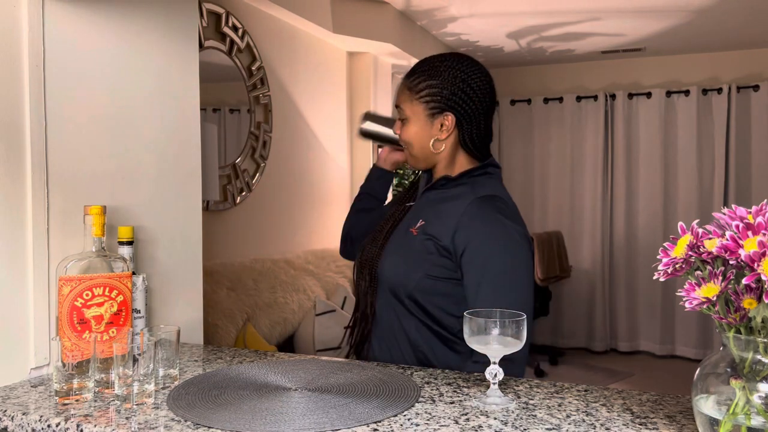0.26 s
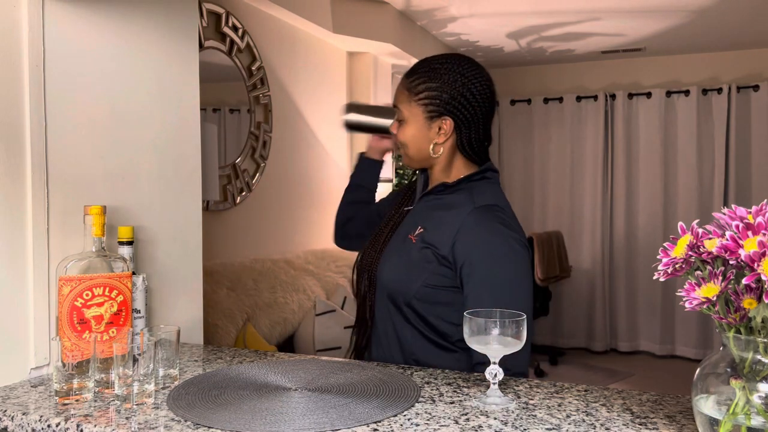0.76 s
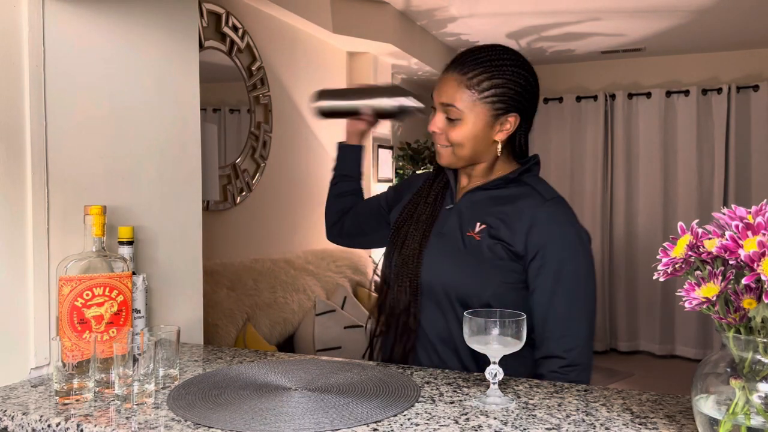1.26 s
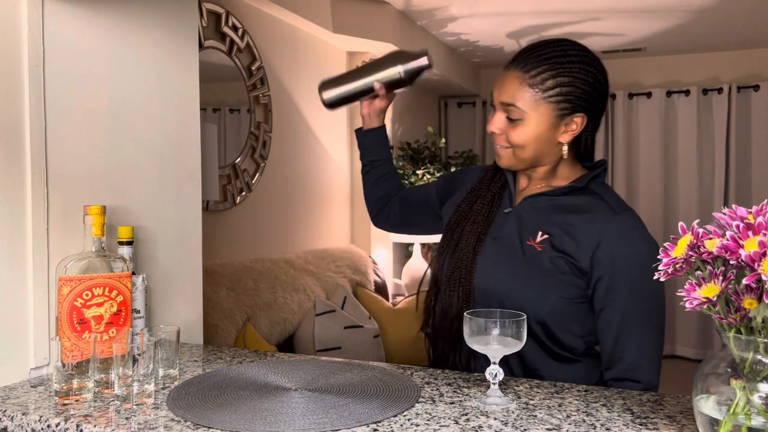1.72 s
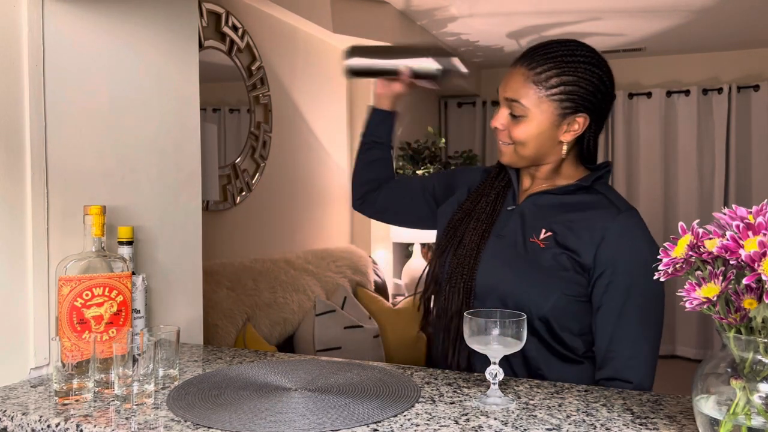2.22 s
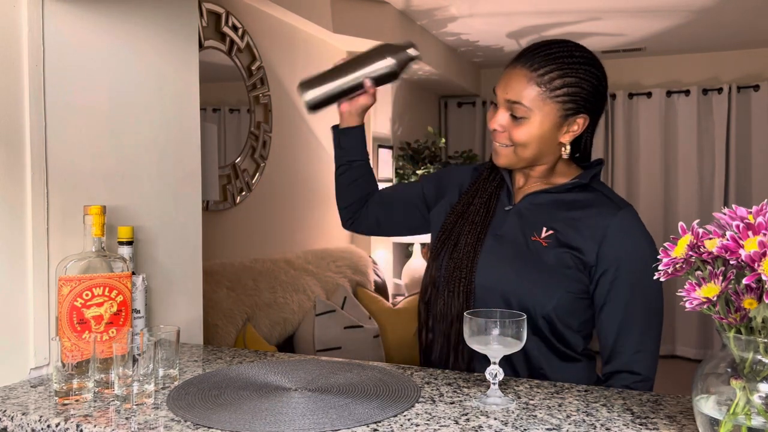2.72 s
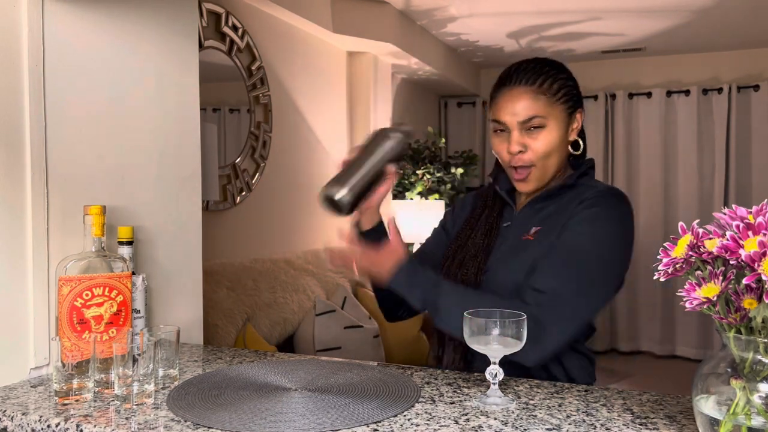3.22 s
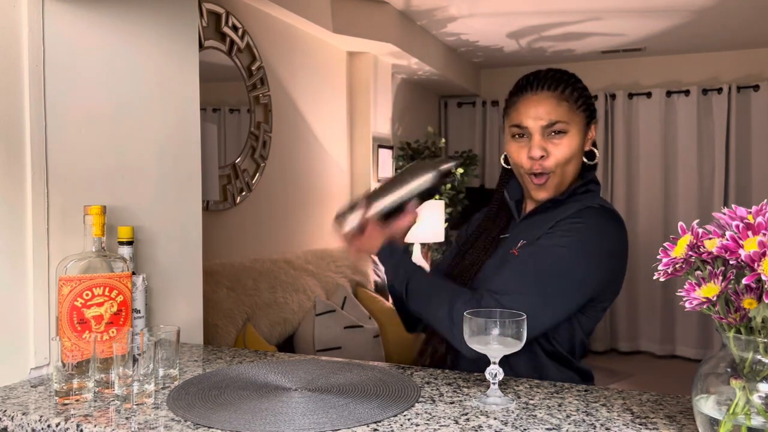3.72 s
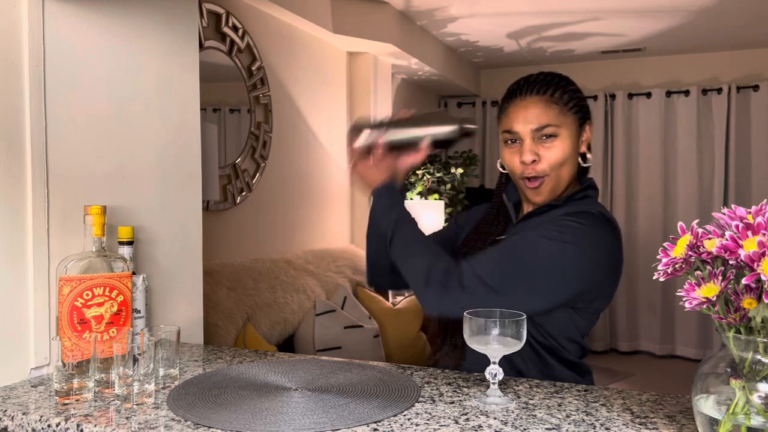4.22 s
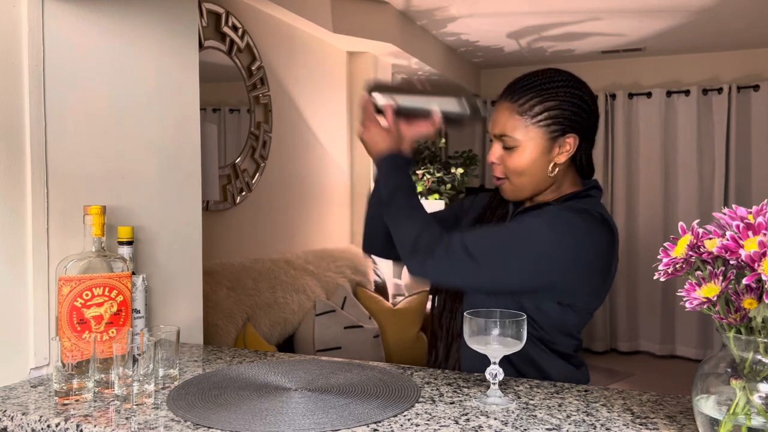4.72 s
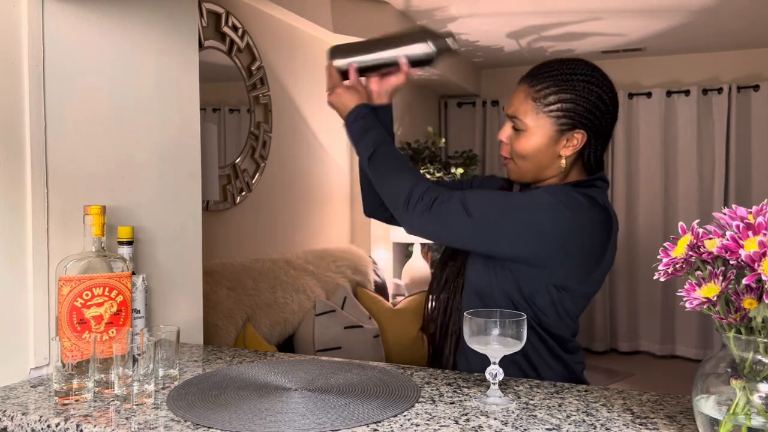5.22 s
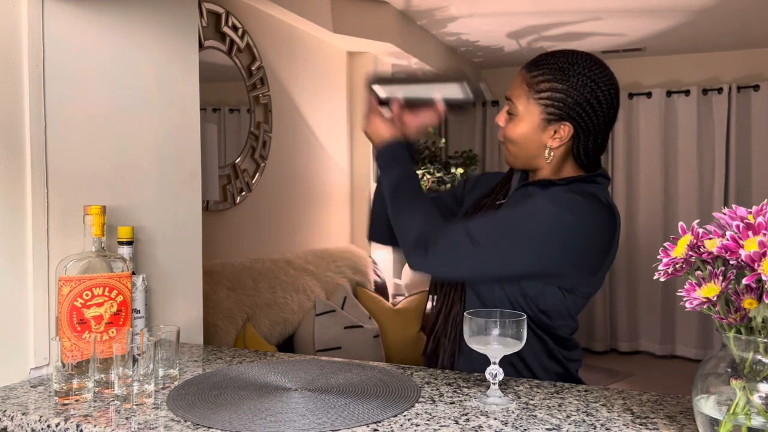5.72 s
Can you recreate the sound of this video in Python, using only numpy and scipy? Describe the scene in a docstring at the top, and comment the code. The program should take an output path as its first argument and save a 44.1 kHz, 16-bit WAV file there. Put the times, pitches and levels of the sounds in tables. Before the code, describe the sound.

A metal cocktail shaker full of ice and liquid is shaken fast throughout. Cubes crash into each end with hard clacks, chips hiss and tumble between, and hollow wet knocks follow. The rhythm loosens briefly a little past three seconds, then resumes. Close stereo pickup in a furnished home with short, lively reflections and faint room air.

```python
"""Ice cubes crash into the ends of a steel cocktail shaker, shaken hard about four strokes to and fro a second.
The crashes are piled-up noise bursts, each touch with its own notes; the liquid slaps after them with a hollow
knock, a sine whose pitch settles. In between, chips and froth churn along the wall as random ticks through
resonators. The hand-damped steel rings briefly, a living room answers, and faint air and hum lie beneath."""
import sys
import numpy as np
from scipy import signal
from scipy.fft import rfft, irfft
from scipy.io import wavfile
from scipy.ndimage import uniform_filter1d

SR = 44100
rng = np.random.default_rng(int(sys.argv[2]) if len(sys.argv) > 2 else 0)


def unload_audio(sound):
    """Save the sound as a 16-bit wav file, at the path given as the first command line argument."""
    columns = np.transpose(np.atleast_2d(sound))
    # keep every value between -1 and 1, then stretch to whole-number steps
    steps = np.round(np.clip(columns, -1, 1) * 32767)
    wavfile.write(sys.argv[1], SR, steps.astype(np.int16))


N = 262836  # length in samples


def amp(db):
    """Decibels to gain."""
    return 10 ** (np.asarray(db) / 20)


def unit(x):
    """Scales to rms 1."""
    return x / np.sqrt(np.mean(x ** 2) + 1e-20)


def crest(x, size=176):
    """Scales the loudest few milliseconds to rms 1."""
    return x / np.sqrt(uniform_filter1d(x ** 2, size).max() + 1e-20)


def read(points, hz):
    """Reads a curve on a log-frequency axis."""
    f, value = np.transpose(points)
    return np.interp(np.log(hz + 1), np.log(f), value)


def add(mix, s, sound):
    """Adds a sound to the mix at time s."""
    part = mix[max(round(s * SR), 0):][:len(sound)]
    part += sound[:len(part)]


def impulse(points, size=2048):
    """The causal, minimum-phase click that has this spectrum."""
    hz = abs(np.fft.fftfreq(size, 1 / SR))
    log_gain = np.log(amp(read(points, hz)))
    return np.fft.ifft(np.exp(np.conj(signal.hilbert(log_gain)))).real


def through(x, response):
    """Convolves and keeps the length."""
    return signal.oaconvolve(x, response)[:len(x)]


def resonate(x, hz, width):
    """One resonance of gain about 1: a wider band dies sooner."""
    r = np.exp(-np.pi * width / SR)
    turn = r * np.cos(2 * np.pi * hz / SR)
    return 2 * (1 - r) * signal.lfilter([1, -turn], [1, -2 * turn, r ** 2], x + 1e-18)


# still air of the room: pitch_hz, density_db (dB per Hz, relative)
AIR = [(20, -18), (68, 4.5), (100, -3.5), (150, -1), (300, -16), (16000, -30)]
# mains hum: pitch_hz, level_db
HUM = [(120, -62)]


def background():
    """Low, slowly swelling room air with a trace of mains hum."""
    t = np.arange(N) / SR
    shared, left, right = (unit(through(rng.standard_normal(N), impulse(AIR, size=8192))) for _ in range(3))
    slow_noise = resonate(resonate(rng.standard_normal(N), 5.6, 4.6), 5.6, 4.6)
    swell = amp(3.8 * unit(slow_noise))
    hum = sum(amp(db) * unit(np.sin(2 * np.pi * hz * t)) for hz, db in HUM)
    return amp(-57.0) * swell * (shared + np.array([left, right]) / 10) + hum


# reverberation: pitch_hz, t60_s
ROOM = [(300, 0.17), (3000, 0.26), (14000, 0.19)]


def room(x, size=22050, count=14):
    """Counter, wall and ceiling echo first; then a diffuse tail dies band by band."""
    t = np.arange(size) / SR
    taps = rng.choice([-1., 1.], size) * (rng.random(size) < .09) * (t > .005)
    hz, when, z = signal.stft(taps, SR, nperseg=256)
    decay = amp(-60 * when / read(ROOM, hz)[:, None])
    tail = signal.istft(z * decay, SR, nperseg=256)[1][:size]
    early = np.zeros(size)
    early[(rng.uniform(.0003, .006, count) * SR).astype(int)] = rng.choice([-1., 1.], count)
    return through(x, amp(-2.5) * tail / np.linalg.norm(tail) + amp(-1.5) * early / np.sqrt(count))


def echoes(x, count=5):
    """The shaker keeps moving, so the sound passes from one pattern of echoes to the next."""
    place = np.arange(N) / SR * 14  # 14 patterns a second, in rotation
    nearness = (np.maximum(1 - abs((place - k) % count - 1), 0) for k in range(count))
    return sum(room(x * np.sqrt(share)) for share in nearness)


# ring of the steel: pitch_hz, width_hz, level_db (over the plain blow)
STEEL = [(1312, 130, 2), (2680, 104, -4), (5700, 59, -31)]
# the air inside the shaker once the liquid has settled
HOLLOW_HZ, HOLLOW_WIDTH_HZ, HOLLOW_DB = 595, 61, -2


def shaker(x):
    """The steel wall rings on after every blow, and so does the hollow, whose pitch moves with the liquid."""
    start_s, _, knock_hz = np.transpose(SLAPS)
    liquid_hz = np.interp(np.arange(N) / SR, start_s, knock_hz)
    hollow_hz = np.sqrt(HOLLOW_HZ * liquid_hz)
    # shift the hollow's pitch down to zero, smooth, and shift back: a resonance that glides
    turn = np.exp(2j * np.pi * np.cumsum(hollow_hz) / SR)
    r = np.exp(-np.pi * HOLLOW_WIDTH_HZ / SR)
    hollow = 2 * (turn * signal.lfilter([1 - r], [1, -r], x / turn)).real
    steel = sum(amp(db) * resonate(x, hz, width) for hz, width, db in STEEL)
    return x + amp(HOLLOW_DB) * hollow + steel


def contacts(count, per_s, spread_db):
    """Random touches of ice: mostly small, a few large."""
    size = np.minimum(rng.exponential(1, count), 3.5)
    sign = rng.choice([-1, 1], count)
    at = np.flatnonzero(rng.random(count) < per_s / SR)
    out = np.zeros(count)
    out[at] = sign[at] * amp(spread_db * size[at])
    return out


def grains(low_hz, high_hz, width_hz, per_s, count=14):
    """Sparse contacts, each ringing at one of many pitches."""
    pitches = low_hz * (high_hz / low_hz) ** ((np.arange(count) + rng.random(count)) / count)
    return unit(sum(resonate(contacts(N, per_s / count, spread_db=2.5), hz, width_hz) for hz in pitches))


def clumps(per_s, decay_s):
    """Each falling cube sets off a short flurry: a level that jumps and dies away."""
    falls = abs(contacts(N, per_s, spread_db=3.5))
    flurry = signal.lfilter([1], [1, -np.exp(-1 / (decay_s * SR))], falls ** 2)
    return unit(.5 + np.sqrt(unit(flurry)))


# loose chips that never come to rest; they nearly stop as the grip changes at 3.3 s:
# start_s, level_db (relative, within the churn)
LOOSE = [(0, -39), (1.6, -38.5), (2.9, -32.5), (3.36, -45), (3.52, -33), (4.25, -37), (4.8, -33.5),
         (5.96, -38.5)]
# the churn rises with the crash, holds while the load tumbles, then dies
CHURN_RISE_S, CHURN_FALL_DB_PER_S = 0.02, 267
# the load tumbles this long at this churn level, longer when thrown harder
TUMBLE_S, TUMBLE_AT_DB = 0.069, -27.5
# the load is faintly heard sliding up to the end just before it lands
SLIDE_S, SLIDE_DB = .016, -9


def sweep_of_load():
    """Each stroke stirs the load up: a slide, a quick rise, a hold and a steady fall, over the loose chips."""
    t = np.arange(N) / SR
    power = amp(np.interp(t, *np.transpose(LOOSE))) ** 2
    for s, *_, churn_db in STROKES:
        tumble_s = TUMBLE_S * amp(churn_db - TUMBLE_AT_DB)
        near = slice(max(round((s - .1) * SR), 0), round((s + .4) * SR))
        age = t[near] - s
        slide = amp(SLIDE_DB) * np.exp(np.minimum(age, 0) / SLIDE_S)
        rise = np.minimum(slide + np.maximum(age, 0) / CHURN_RISE_S, 1)
        fall_db = CHURN_FALL_DB_PER_S * np.maximum(age - tumble_s, 0)
        power[near] += (rise * amp(churn_db - fall_db)) ** 2
    return np.sqrt(power)


def churn():
    """Tumbling cubes, fine chips and sloshing liquid all follow the sweep of the load."""
    t = np.arange(N) / SR
    start_s, clack_db, crack_db, *_ = np.transpose(STROKES)
    # after a dry, bright crash the chips hiss; after a wet, dull one the cubes and the liquid take over
    brightness_db = crack_db - clack_db
    dryness_db = np.clip(brightness_db - np.median(brightness_db), -10, 10)
    dryness = amp(np.interp(t - 0.03, start_s, dryness_db))

    cubes = unit(contacts(N, per_s=260, spread_db=2.5))
    chips = unit(contacts(N, per_s=1100, spread_db=5.0))
    tumble = unit(through(cubes, impulse(CLACK))) + grains(948, 1995, width_hz=120, per_s=140)
    fizz = unit(through(chips + cubes, impulse(CRACK)))
    fizz = fizz + amp(-4.0) * grains(2507, 5780, width_hz=68, per_s=130)
    ticks = unit(through(chips + cubes, impulse(TINK)))
    slosh = unit(resonate(grains(455.0, 803, width_hz=25.5, per_s=80), 880, 620))

    bright = (amp(-5.5) * fizz + amp(-16.5) * ticks) * dryness ** 0.047
    dull = (amp(-6.5) * tumble + amp(-7.0) * slosh) / dryness ** 0.35
    return sweep_of_load() * clumps(per_s=110, decay_s=0.011) * (bright + dull)


# a cube hits the bare steel with a bright tick: start_s, level_db (relative)
TINKS = [(0.705, -23), (0.983, -24), (1.139, -19.5), (1.246, -11.5), (1.377, -22), (1.503, -15),
         (2.041, -22.5), (2.569, -24), (3.042, -25), (3.2255, -25), (4.614, -24)]
# high ring of the bare steel under a sharp tick: pitch_hz, width_hz, level_db (over the plain tick)
SHIMMER = [(13100, 53, -2), (14000, 110, 13)]
# a cube strikes cleanly and rings: start_s, level_db (relative), pitch_hz
CLINKS = [(0.86, -21, 2424), (1.252, -19.5, 1675), (2.042, -24.5, 1646), (2.831, -26, 1353),
          (3.543, -26, 1510), (4.098, -29.5, 2680), (4.864, -24, 1870), (5.328, -26, 1560),
          (5.947, -25, 1890)]


def clinks(size=4000):
    """Dry contacts: bright ticks of the steel and short pitched rings of the ice, shorter when higher."""
    t, out = np.arange(size) / SR, np.zeros(N)
    for s, db in TINKS:
        tick = through(rng.standard_normal(size) * np.exp(-t / 0.0042), impulse(TINK))
        ring = sum(amp(ring_db) * resonate(tick, hz, width) for hz, width, ring_db in SHIMMER)
        add(out, s, amp(db - 5.0) * crest(tick + ring))
    for s, db, hz in CLINKS:
        shape = (1 - np.exp(-t / 0.00008)) * np.exp(-t * hz / 19)
        add(out, s, amp(db) * crest(np.sin(2 * np.pi * hz * t) * shape))
    return out


# the liquid slaps an end and the air pocket knocks, lower as the drink froths up:
# start_s, level_db (relative), pitch_hz (at the onset)
SLAPS = [(.197, -17, 725), (.226, -21, 617), (.329, -20, 787), (.454, -20.5, 736), (.704, -14, 680),
         (.737, -24.5, 614), (.995, -16, 670), (1.397, -21, 722), (1.509, -22.5, 622), (1.812, -23, 590),
         (2.053, -21, 587), (2.096, -27, 600), (2.204, -21, 717), (2.3, -23, 570), (2.332, -22.5, 573),
         (2.455, -23.5, 702), (2.576, -22, 565), (2.817, -29, 573), (3.055, -19.5, 596),
         (3.226, -13.5, 585), (3.557, -27, 570), (3.606, -16, 581), (3.754, -23, 600), (3.775, -26.5, 530),
         (4.06, -26.5, 605), (4.188, -17.5, 601), (4.219, -23.5, 522), (4.459, -22, 620),
         (4.542, -25.5, 580), (4.615, -20, 652), (5.087, -17, 506), (5.336, -21.5, 572), (5.393, -22, 590),
         (5.432, -25, 570), (5.479, -18.5, 598), (5.508, -19, 608), (5.535, -25, 569), (5.948, -25, 616)]
KNOCK_RISE_S, KNOCK_FALL_S, SETTLE_S = 0.0035, 0.0036, 0.064
AFTER_RING_DB, AFTER_RING_S = -19.5, 0.017  # the hollow sings on after a knock
# the whole load lands at once and thumps against the hand: start_s, level_db (relative)
THUMPS = [(.073, -37), (.329, -35), (0.597, -41), (.862, -37), (1.501, -33), (4.187, -35), (4.325, -36)]
THUMP_HZ, THUMP_S = 253, 0.0045


def slaps(size=5000):
    """The air pocket swells and rings while its pitch settles to that of the hollow; a heavy landing thumps too."""
    t, out = np.arange(size) / SR, np.zeros(N)
    fall = np.exp(-t / KNOCK_FALL_S) + amp(AFTER_RING_DB) * np.exp(-t / AFTER_RING_S)
    shape = (1 - np.exp(-t / KNOCK_RISE_S)) ** 2 * fall
    for s, db, hz in SLAPS:
        pitch_hz = HOLLOW_HZ + (hz - HOLLOW_HZ) * np.exp(-t / SETTLE_S)
        knock = np.sin(2 * np.pi * np.cumsum(pitch_hz) / SR)
        gurgle = resonate(rng.standard_normal(size), hz, 270)
        add(out, s, amp(db) * crest(shape * (knock + amp(-9) * unit(gurgle))))
    for s, db in THUMPS:
        push = rng.standard_normal(size) * t * np.exp(-t / THUMP_S)
        thump = resonate(resonate(push, THUMP_HZ, THUMP_HZ), THUMP_HZ, THUMP_HZ)
        add(out, s, amp(db) * crest(thump))
    return out


# each turn of the shaker, when the load crashes into an end (levels relative):
# start_s, clack_db, crack_db, pile_s (time scale of the cubes piling up), churn_db
STROKES = [ (0.069, -22, -29.5, 0.01, -32), (0.196, -22.5, -34.5, 0.017, -59),
           (0.3278, -20.5, -23, 0.01, -32), (0.452, -25.5, -31, 0.025, -41),
           (0.586, -24.5, -24.5, 0.019, -33), (.706, -24, -30, 0.0065, -34.5),
           (0.838, -21.5, -24.5, 0.028, -29), (0.9944, -19.5, -25, 0.013, -48),
           (1.123, -25, -26, 0.025, -32.5), (1.2434, -21, -23, 0.014, -29),
           (1.385, -25, -25.5, 0.022, -30.5), (1.502, -16, -21.5, 0.0096, -31.5),
           (1.637, -29.5, -24.5, 0.023, -28.5), (1.774, -27.5, -43, 0.022, -33.5),
           (1.934, -25, -25, 0.018, -33), (2.06, -24, -32, 0.015, -46), (2.194, -26.5, -24, 0.018, -30),
           (2.3209, -25.5, -33, 0.016, -41), (2.443, -27.5, -26.5, 0.012, -28),
           (2.5692, -23, -30.5, 0.023, -48), (2.674, -30, -26.5, 0.032, -29),
           (2.8242, -20.5, -31.5, 0.013, -44), (2.8899, -41, -31, 0.0099, -37),
           (3.041, -21.5, -33.5, 0.021, -42), (3.223, -23, -41, 0.024, -32),
           (3.416, -32, -28.5, 0.01416, -29.5), (3.61, -36.5, -31, 0.031, -38),
           (3.74, -24.5, -28.5, 0.025, -43), (3.85, -38, -29, 0.023, -51), (3.943, -15.5, -24, 0.0035, -34),
           (4.064, -52, -30.5, 0.018, -30.5), (4.1854, -22, -28.5, 0.016, -38),
           (4.294, -27, -22, 0.03, -26.5), (4.428, -21, -31, 0.0071, -34),
           (4.617, -20.5, -24.5, 0.025, -31), (4.7367, -36, -25.5, 0.0064, -28),
           (4.959, -29.5, -26, 0.018, -31), (5.0721, -21.5, -26.5, 0.021, -44),
           (5.197, -25, -24.5, 0.0123, -27), (5.39, -27, -25.5, 0.0032, -33),
           (5.488, -26.5, -27, 0.0062, -30), (5.612, -28, -25.5, 0.019, -29),
           (5.804, -26.5, -21.5, 0.0062, -31), (5.899, -24.5, -32, 0.021, -32.5)]
# a cube out of step with the rest lands alone: start_s, clack_db, crack_db (relative)
STRAYS = [(.084, -28, -31), (.48, -21, -53), (0.6, -21.5, -26), (0.8716, -17, -20.5), (0.982, -22, -28),
          (1.031, -23.5, -33), (1.216, -25.5, -31), (1.2775, -21.5, -37), (1.4015, -20.5, -24.5),
          (1.6834, -26.5, -28), (1.751, -27.5, -27.5), (1.8109, -22.5, -29), (1.995, -35, -31),
          (2.018, -24, -24.5), (2.041, -22, -27.5), (2.0918, -23.5, -36), (2.18, -25, -22.5),
          (2.4532, -18.5, -23.5), (2.532, -23, -33), (2.755, -18.5, -29), (2.772, -33.5, -30.5),
          (2.933, -23.5, -32), (2.992, -25.5, -31), (3.205, -21.5, -29.5), (3.45, -36, -41),
          (3.491, -20.5, -27), (3.5624, -23.5, -23.5), (4.171, -24, -26), (4.51, -28.5, -26.5),
          (4.756, -23.5, -33), (4.826, -18, -25), (4.8611, -20, -27.5), (4.931, -24.5, -28),
          (5.046, -23.5, -23), (5.096, -17.5, -43), (5.329, -25.5, -31), (5.509, -28, -44),
          (5.539, -23, -41), (5.59, -29, -27), (5.659, -28.5, -19.5), (5.689, -20, -24), (5.861, -27, -28)]
BOUNCE_S = 0.00465  # time scale on which a lone cube settles


def landings():
    """Whole loads and lone cubes alike: start_s, clack_db, crack_db, pile_s."""
    return [row[:4] for row in STROKES] + [(*row, BOUNCE_S) for row in STRAYS]


# spectra of the blows, dull to bright: pitch_hz, density_db (dB per Hz, relative)
CLACK = [(60, -22.5), (200, -16.5), (380, -3.5), (520, 2), (1000, 0), (1600, -5), (2300, -4), (3000, -30),
         (6000, -41)]
CRACK = [(700, -56), (1800, -3), (2700, -2), (4000, 2), (5400, 0), (6200, -8.5), (8300, -5), (11000, -17.5)]
TINK = [(7000, -38), (10500, 21.5), (11700, 13.5), (14000, 8.5), (16000, -12)]
CUBE_RING_DB = 6  # note of each cube over its plain touch


def crashes(size=4096, count=6):
    """One cube lands first with a hard snap; a few more pile up behind it, each with its own notes."""
    t, out = np.arange(size) / SR, np.zeros(N)
    colours = [impulse(c) for c in (CLACK, CRACK, TINK)]
    ring = amp(CUBE_RING_DB)
    for s, clack_db, crack_db, pile_s in landings():
        pile_s = max(pile_s, .002)
        lag = 1.5 * (np.arange(count) + rng.random(count)) / count  # in units of pile_s
        # a longer pile-up puts more force into the cubes behind the first
        force = pile_s / .009 * unit(lag * np.exp(-2.3 * lag)) / np.sqrt(count)
        ages = np.maximum(t - pile_s * np.append(0, lag)[:, None], 0)
        touches = []
        for f, age in zip([1, *force], ages):
            burst = rng.standard_normal(size) * age * np.exp(-age / 0.00065)
            touches.append(f * unit(burst))
        low = sum(x + ring * resonate(x, rng.uniform(830, 1966), 127) for x in touches)
        high = sum(x + ring * resonate(x, rng.uniform(2370, 5630), 280) for x in touches)
        bright = sum(touches) + touches[0]  # the first touch is the brightest
        clack, crack, tink = (crest(through(x, colour)) for x, colour in zip((low, high, bright), colours))
        add(out, s, amp(clack_db) * clack + amp(crack_db + 1) * (crack + amp(-9.0) * tink))
    return out


# left over right: pitch_hz, level_db
BALANCE = [(100, 0), (1000, 1), (4200, 3), (7500, 0.5)]
# the two microphone ports drift out of step in the treble: pitch_hz, lead_rad (left ahead of right)
PORT_PHASE = [(500, 0), (4000, .6), (7400, -.3), (9100, -3), (12500, -6.2)]


def microphone_ports(heard):
    """Level and phase differ between left and right by pitch, half on each side."""
    hz, side = np.fft.rfftfreq(N, 1 / SR), np.array([[.5], [-.5]])
    ports = amp(side * read(BALANCE, hz)) * np.exp(1j * side * read(PORT_PHASE, hz))
    return irfft(rfft(heard) * ports, N)


KNOCK_DB, KNOCK_ROOM_DB = -4, -3  # gain of the knocks, and their extra gain into the room


def scene():
    """The shaker stands a little left; its bright clatter carries further into the room than the knocks."""
    clatter = amp(-4.5) * shaker(crashes() + clinks() + churn())
    knocks = amp(KNOCK_DB) * slaps()
    to_room = clatter + amp(KNOCK_ROOM_DB) * knocks
    heard = np.array([clatter + knocks + echoes(to_room) for _ in range(2)])  # each side has its own echoes
    return microphone_ports(heard) + background()


# microphone colour with its narrow notch: pitch_hz, level_db
MIC = [(8700, -1.5), (9400, -9.5), (9800, -34), (10400, -27.5), (11200, -2)]
EDGE_HZ = 16100  # upper band limit


def record(dry):
    """Microphone colour, then the band limit."""
    coloured = np.array([through(channel, impulse(MIC)) for channel in dry])
    lowpass = signal.firwin(301, EDGE_HZ, window=("kaiser", 9), fs=SR)
    return signal.oaconvolve(coloured, lowpass[None], "same")


dry = scene()
out = record(dry)
unload_audio(out)
```